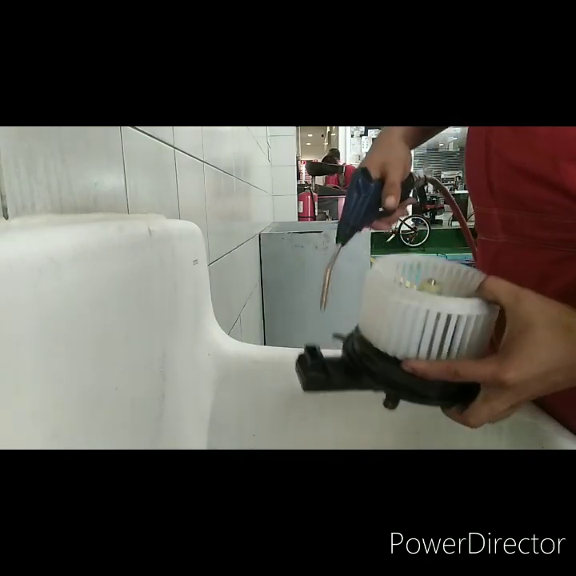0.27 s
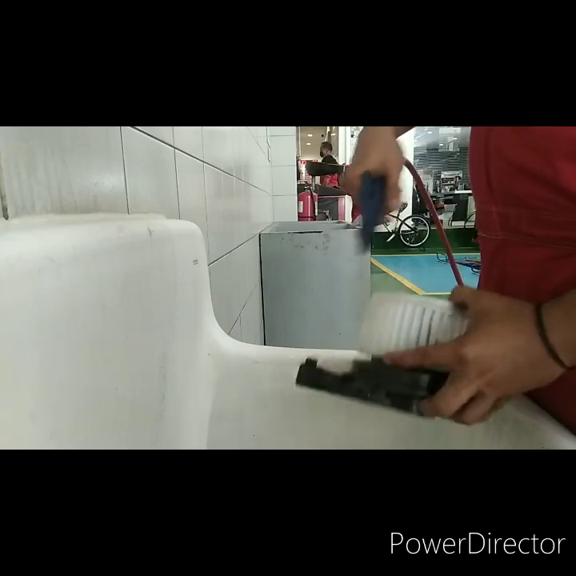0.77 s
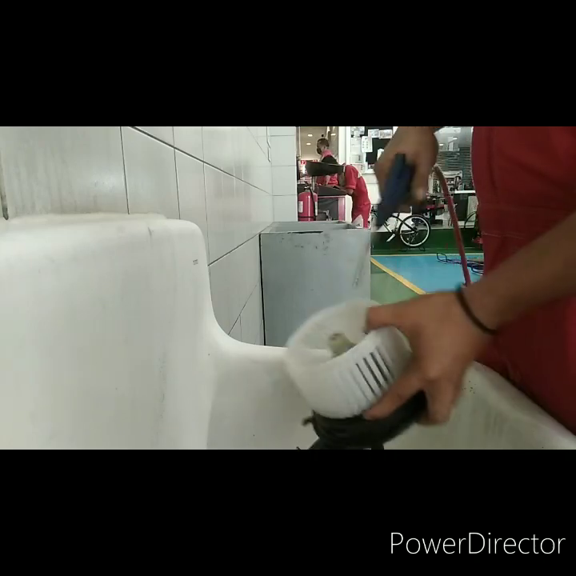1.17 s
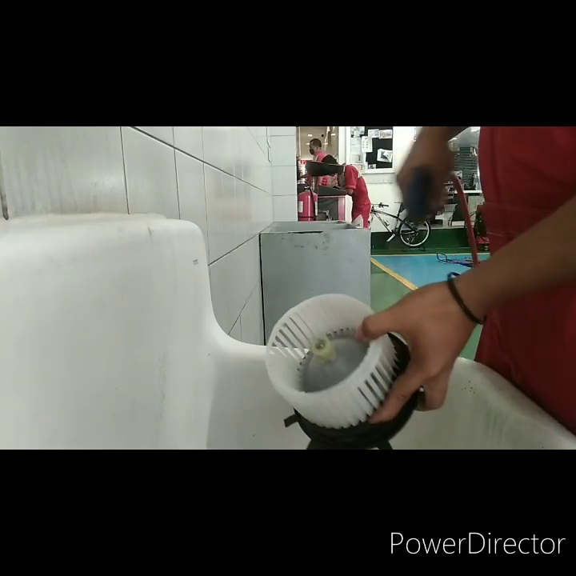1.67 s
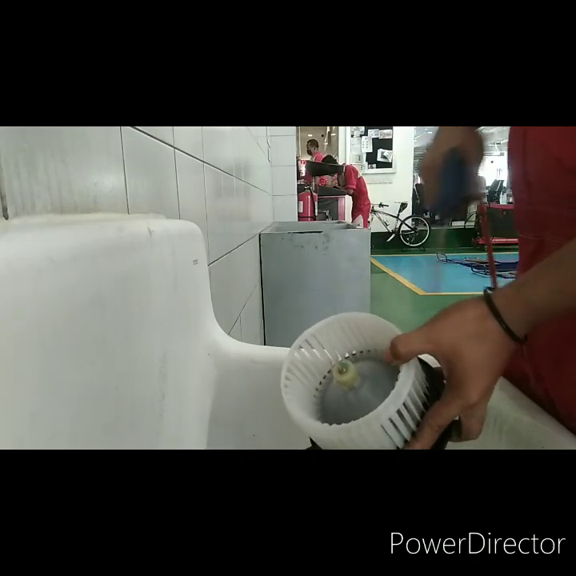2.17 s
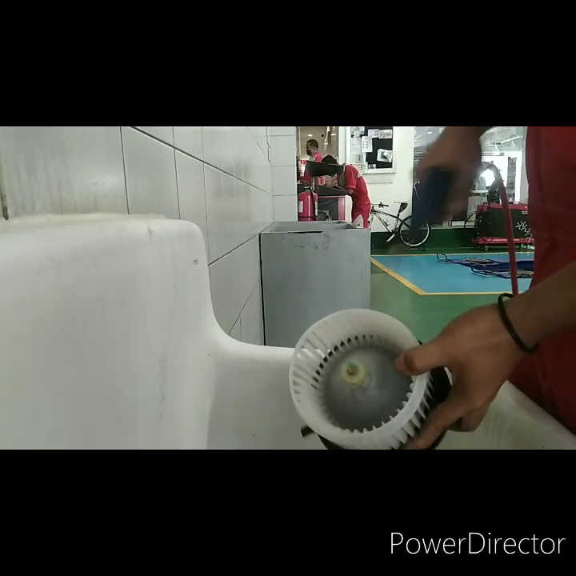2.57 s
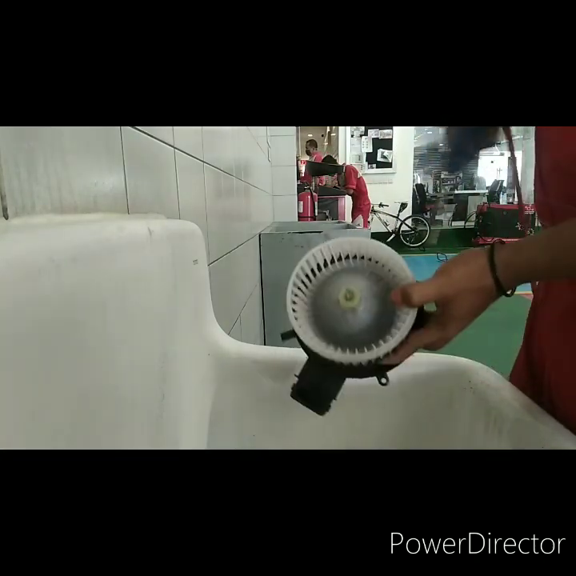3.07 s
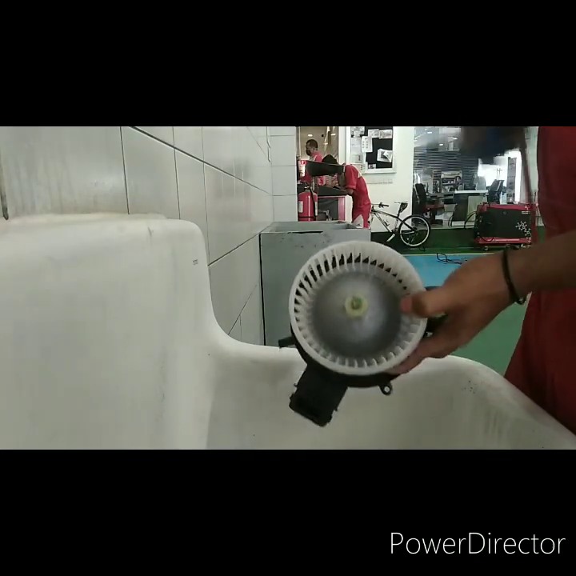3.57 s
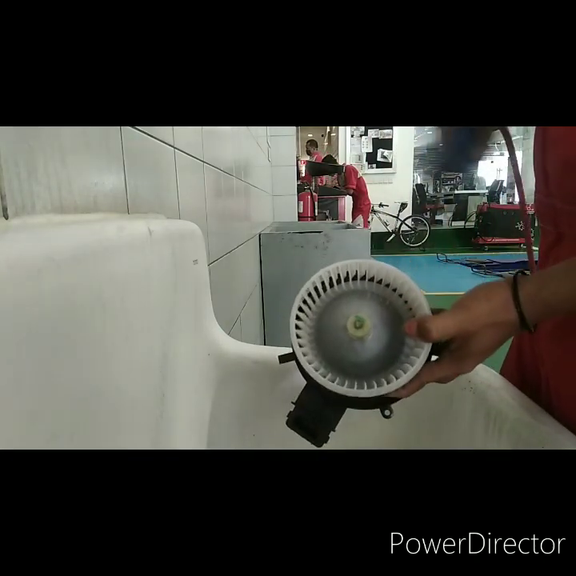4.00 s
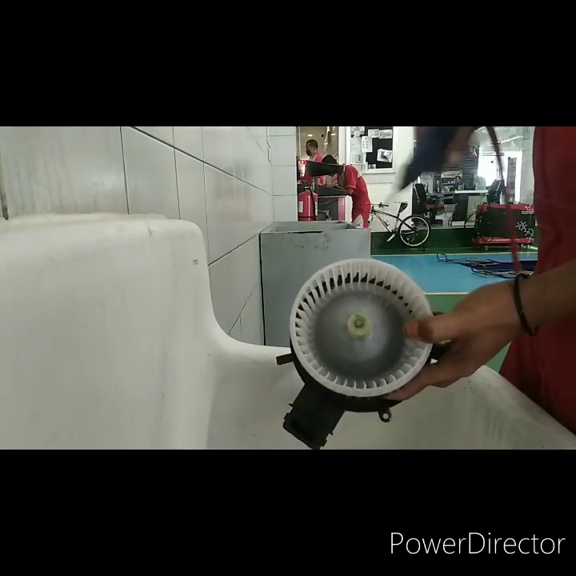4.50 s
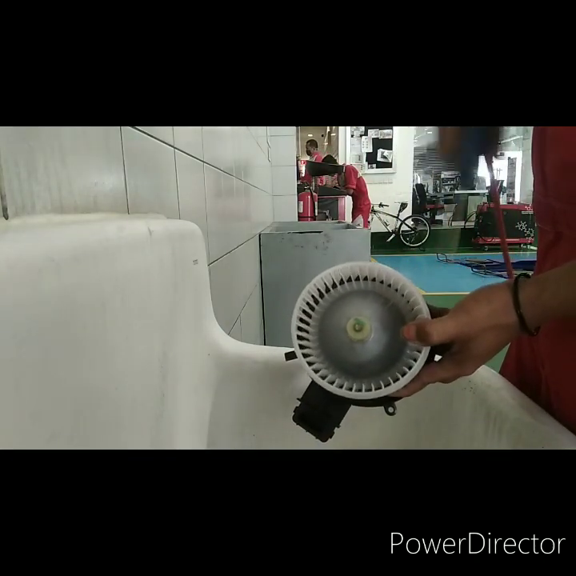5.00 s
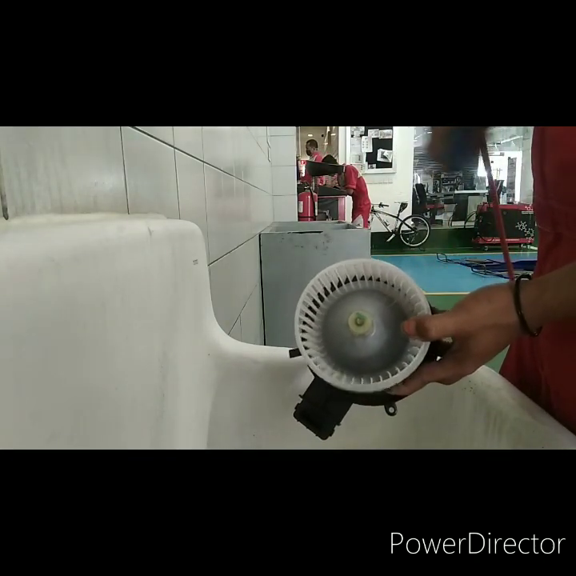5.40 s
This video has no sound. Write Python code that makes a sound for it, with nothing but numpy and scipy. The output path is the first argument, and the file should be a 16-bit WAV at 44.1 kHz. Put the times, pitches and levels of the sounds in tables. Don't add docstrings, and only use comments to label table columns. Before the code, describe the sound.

A compressed-air gun hisses and roars in a big workshop, its jet fluttering and flaring as it sweeps across a plastic fan wheel.

```python
import sys
import numpy as np
from scipy import signal
from scipy.fft import rfft, irfft, next_fast_len
from scipy.io import wavfile
from scipy.ndimage import uniform_filter1d

SR = 44100
rng = np.random.default_rng(int(sys.argv[2]) if len(sys.argv) > 2 else 0)


def convert_level_to_amplitude(level_db):
    exponent = np.asarray(level_db, float) / 20
    return 10 ** exponent


def store_wav(level_fs):
    pcm = np.round(np.clip(np.atleast_2d(level_fs), -1, 1) * 32767)
    wavfile.write(sys.argv[1], SR, pcm.T.astype(np.int16))


N = 249165
N_FFT = next_fast_len(N)
TIME = np.arange(N) / SR

# (frequency [Hz], level [dB per Hz])
TAIL_COLOUR = [(500, -11), (1200, -9), (2400, 0), (4400, 1), (10800, -10), (13600, -23), (17000, -40)]
HALL_COLOUR = [(20, -30), (60, -24), (150, -4), (300, -6), (550, -8.5), (1200, -12), (4000, -24),
               (16000, -37)]
# (frequency [Hz], level [dB per Hz])
ROAR_COLOUR = [(1200, -12), (2200, -6.5), (3000, -2), (5000, -1), (6500, -3), (8000, 0), (12000, -41)]
TEARING_COLOUR = [(5000, -11), (7000, -11), (8500, -5), (9800, -1), (11500, -1.5), (12800, -10),
                  (14000, -19), (16000, -30)]
NOZZLE_COLOUR = [(9000, -24), (12000, -13.5), (13500, -9.5), (17000, -12)]
# (frequency [Hz], level [dB per Hz])
BUFFET_COLOUR = [(25, -40), (75, -30), (110, -10), (170, -1), (300, -1.5), (480, -2.5), (800, -8.5),
                 (1600, -37)]
RUSH_COLOUR = [(250, -5.5), (500, -4.5), (800, 0.5), (1300, -1), (2000, -2), (2800, -5), (5000, -10)]
# (time [s], level [dB])
AIM = [(.3, -1.5), (.43, 4), (.59, 4), (.8, 1.5), (1.2, -2), (1.45, 1.5), (1.65, 1.5), (2.0, 1), (2.3, 0.5),
       (2.7, 0.5), (3.1, -1), (3.4, -1.5), (3.67, -2.5), (3.85, 0), (4.1, .5), (4.7, -0.5), (5.1, -1),
       (5.65, -1)]
# (middle [s], length [s], boost [dB])
CROSSINGS = [(0.791, 0.054, 0.5), (0.948, 0.089, 2.5), (1.133, 0.039, 3), (1.261, 0.088, 2.5),
             (1.544, 0.16, 1.5), (1.732, 0.044, 2.4), (1.901, 0.052, 1.8), (1.988, 0.057, 2.8),
             (2.197, 0.093, 1.8), (2.442, 0.063, 2.2), (2.677, 0.052, 3.2), (2.885, 0.12, 1),
             (3.128, 0.059, 3.5), (3.207, 0.021, 2), (3.339, 0.034, 0.5), (3.448, 0.047, 2),
             (3.523, 0.025, -2), (3.628, 0.023, 1), (3.794, 0.046, 3.5), (4.001, 0.043, 3.5),
             (4.193, 0.055, 4), (4.409, 0.061, 5), (4.621, 0.059, 4), (4.829, 0.098, 4.0),
             (5.048, 0.074, 3.5), (5.185, 0.034, 1), (5.265, 0.057, 3.5), (5.477, 0.051, 2.5)]
# (middle [s], length [s], loss [dB])
MISSES = [(0.723, 0.094, 3), (1.112, 0.072, 2.3), (1.374, 0.045, 2.5), (1.449, 0.084, 4),
          (1.66, 0.098, 1.4), (1.765, 0.049, 3.5), (2.104, 0.075, 2.5), (2.313, 0.054, 2.6),
          (2.548, 0.072, 2), (2.789, 0.054, 3), (3.018, 0.056, 3.5), (3.15, 0.019, 3), (3.231, 0.09, 1.9),
          (3.41, 0.057, 2), (3.495, 0.044, 2.5), (3.595, 0.034, 3), (3.662, 0.033, 4.5),
          (3.895, 0.066, 1.5), (4.075, 0.052, 3), (4.3, 0.043, 1.5), (4.406, 0.034, 4.5),
          (4.515, 0.08, 1.7), (4.836, 0.043, 1), (4.949, 0.053, 2), (5.061, 0.045, 2), (5.166, 0.037, 2.3),
          (5.376, 0.061, 1), (5.573, 0.077, 1)]
# (middle [s], loss [dB])
TIPS = [(0.544, 3), (0.617, 2), (0.909, 1), (1.088, 1), (1.297, 1.3), (1.381, 1), (1.531, 0.8), (1.651, 1),
        (2.02, 1), (2.324, 1), (2.531, 1.4), (2.707, 1.0), (2.782, 1), (3.163, 3), (3.304, 3), (3.385, 1.6),
        (3.499, 1), (3.583, 3), (3.655, 1.4), (3.884, 1), (3.961, 1.2), (4.048, 1.4), (4.168, 1.9),
        (4.458, 0), (4.68, 1), (4.893, 1), (5.102, 2), (5.313, 1.0), (5.442, 2.1), (5.517, 2.3)]
# (start [s], end [s], level [dB])
GUSTS = [(0.39, 0.626, -26.5), (0.65, 0.67, -26), (0.776, 0.897, -27), (0.92, 1.04, -31),
         (1.14, 1.153, -24), (1.216, 1.227, -28), (1.27, 1.288, -23), (1.504, 1.623, -27.5),
         (1.725, 1.735, -25.5), (1.82, 1.837, -33), (1.933, 2.067, -28.5), (2.154, 2.294, -28),
         (2.393, 2.43, -31), (2.458, 2.52, -28.5), (2.617, 2.67, -28.5), (2.707, 2.75, -27.5),
         (2.846, 2.982, -27.5), (3.055, 3.19, -29), (3.26, 3.413, -29.5), (3.467, 3.635, -29),
         (3.685, 3.872, -29.5), (3.931, 4.077, -28), (4.122, 4.282, -29), (4.333, 4.5, -27),
         (4.538, 4.935, -28), (4.979, 5.14, -28), (5.19, 5.355, -29.5), (5.4, 5.474, -29.5),
         (5.502, 5.563, -28), (5.618, 5.654, -28.5)]


def rms_one(x):
    return x / np.sqrt(np.mean(x ** 2, axis=-1, keepdims=True) + 1e-20)


def ramp(start_s, rise_s):
    return np.clip((TIME - start_s) / rise_s, 0, 1)


def drift(rate_hz):
    hop = 64
    pole = np.exp(-2 * np.pi * rate_hz * hop / SR)
    noise = rng.standard_normal((2, N // hop + 1002))
    slow = signal.lfilter([1], [1, -2 * pole, pole * pole], noise)[:, 1000:]
    return np.repeat(rms_one(slow), hop, axis=1)[:, :N]


def turbulence(colour, patchy_db, rate_hz, alike_hz=1.0):
    hz = np.maximum(np.fft.rfftfreq(N_FFT, 1 / SR), 1)
    colour_hz, colour_db = np.transpose(colour)
    left, other = rfft(rng.standard_normal((2, N_FFT)))
    alike = 1 / (1 + (hz / alike_hz) ** 2)
    right = alike * left + np.sqrt(1 - alike ** 2) * other
    level_db = np.interp(np.log(hz), np.log(colour_hz), colour_db, left=-90, right=-90)
    pair = np.array([left, right]) * convert_level_to_amplitude(level_db)
    centres_hz = np.geomspace(colour_hz[0], colour_hz[-1], num=4)
    total = 0
    for share in np.eye(len(centres_hz)):
        band = np.sqrt(np.interp(np.log(hz), np.log(centres_hz), share))
        flicker = convert_level_to_amplitude(patchy_db * drift(rate_hz))
        total = total + irfft(pair * band, N_FFT)[:, :N] * flicker
    return rms_one(total)


def burst(start_s, end_s, centre_hz, width_hz, level_db):
    edges_hz = [centre_hz - width_hz / 2, centre_hz + width_hz / 2]
    band = signal.butter(2, edges_hz, "band", fs=SR, output="sos")
    swell = np.sqrt(np.sin(np.pi * ramp(start_s, end_s - start_s)).clip(0))
    return convert_level_to_amplitude(level_db) * swell * rms_one(signal.sosfilt(band, rng.standard_normal(N)))


def workshop():
    tail_db = -37.5 - 60 * TIME / 2.4
    tail = convert_level_to_amplitude(tail_db) * turbulence(TAIL_COLOUR, patchy_db=0.5, rate_hz=7.9)
    hall = convert_level_to_amplitude(-55) * turbulence(HALL_COLOUR, patchy_db=1.5, rate_hz=6, alike_hz=550)
    return tail + hall


def distant_machine():
    return burst(start_s=0.005, end_s=0.13, centre_hz=168, width_hz=30, level_db=-55)


def aim_db():
    time_s, level_db = np.transpose(AIM)
    return np.interp(TIME, time_s, level_db)


def sweeps_db(sweeps):
    coarse = TIME[::32]
    bumps = 0
    for middle_s, length_s, height_db in sweeps:
        offset = np.abs(2 * (coarse - middle_s) / length_s)
        bumps = bumps + height_db * 2 ** -offset ** 6.3
    return np.interp(TIME, coarse, bumps)


def ports(level_db, pan_db):
    left_share = 1 / (1 + convert_level_to_amplitude(-2 * pan_db) * np.ones(N))
    return 2 * convert_level_to_amplitude(level_db) * np.sqrt([left_share, 1 - left_share])


def jet(opened):
    aim, flare, miss = aim_db(), sweeps_db(CROSSINGS), sweeps_db(MISSES)
    tip = sweeps_db([(middle_s, 0.035, loss_db) for middle_s, loss_db in TIPS])
    first = 4.8 * np.clip(np.minimum((TIME - 0.33) / 0.03 + 1, (0.53 - TIME) / 0.015), 0, 1)
    trigger_db = -25 * (1 - ramp(0.26, 0.044)) ** 1.5

    roar_db = -23.5 + aim - 0.95 * miss
    tearing_db = -20.5 + 0.42 * aim + first + 1.43 * flare - 0.14 * miss
    nozzle_db = -20 + 0.15 * aim - 0.3 * first + 0.48 * flare - 1.7 * tip

    roar = ports(roar_db, 0.11) * turbulence(ROAR_COLOUR, patchy_db=-0.4, rate_hz=22)
    tearing = ports(tearing_db, -2.5) * turbulence(TEARING_COLOUR, patchy_db=1.0, rate_hz=19)
    nozzle = ports(nozzle_db, 0.25) * turbulence(NOZZLE_COLOUR, patchy_db=0.6, rate_hz=14)
    return opened * convert_level_to_amplitude(trigger_db) * (roar + tearing + nozzle)


def basin(x):
    scatter = 2.1
    shared = 0.94
    _, _, lines = signal.stft(x, SR, nperseg=1024, noverlap=768)
    real, imag = rng.standard_normal((2, 3) + lines.shape[1:])
    for axis, size in ((1, 3), (1, 2), (2, 12), (2, 8)):
        real = uniform_filter1d(real, size=size, axis=axis)
        imag = uniform_filter1d(imag, size=size, axis=axis)
    paths = real + 1j * imag
    paths = np.sqrt(shared) * paths[2] + np.sqrt(1 - shared) * paths[:2]
    paths = paths / np.sqrt(np.mean(np.abs(paths) ** 2))
    response = np.abs(1 + scatter * paths) / np.hypot(1, scatter)
    return signal.istft(lines * response, SR, nperseg=1024, noverlap=768)[1][:, :N]


def draught(opened):
    left_buffet, left_rush = gusty_port()
    right_buffet, right_rush = steady_port()
    eddies = convert_level_to_amplitude(1.3 * drift(72))
    buffet_gain = convert_level_to_amplitude(1.46) * np.array([left_buffet, right_buffet])
    buffet = buffet_gain * turbulence(BUFFET_COLOUR, patchy_db=0.8, rate_hz=42)
    forerunner = convert_level_to_amplitude(-43) * ramp(0.27, 0.025)
    rush_gain = convert_level_to_amplitude(2.5) * np.maximum([left_rush, right_rush], forerunner)
    rush = rush_gain * turbulence(RUSH_COLOUR, patchy_db=2.5, rate_hz=12.6)
    return opened * eddies * (buffet + rush)


def valve():
    filling = burst(start_s=0.274, end_s=0.33, centre_hz=620, width_hz=90, level_db=-43)
    return filling * convert_level_to_amplitude(np.array([[1.5], [-1.5]]))


def steady_port():
    miss = sweeps_db(MISSES)
    buffet_db = -27.5 - 0.14 * miss
    rush_db = -25 - 1.64 * miss + 0.26 * aim_db()
    return convert_level_to_amplitude(np.array([buffet_db, rush_db])) * [ramp(0.338, 0.03), ramp(0.317, 0.094)]


def gusty_port():
    lull_db = np.array([[-44], [-36]])
    power = convert_level_to_amplitude(2 * lull_db) * ramp(0.345, 0.015)
    for start_s, end_s, buffet_db in GUSTS:
        rush_db = buffet_db - 0.5 + 1.15 * (start_s - TIME.mean())
        gust = slice(round(start_s * SR), round(end_s * SR))
        power[:, gust] = convert_level_to_amplitude(2 * np.array([[buffet_db], [rush_db]]))
    edge = round(0.015 * SR / 2)
    for _ in range(2):
        power = uniform_filter1d(power, size=edge)
    return np.sqrt(np.abs(power))


def scene():
    opened = ramp(0.26, 0.015)
    return workshop() + distant_machine() + basin(jet(opened)) + draught(opened) + valve()


def top_cut(x):
    return signal.sosfilt(signal.butter(12, 16760, fs=SR, output="sos"), x)


def record(dry):
    soft = 0.72 * np.tanh(dry / 0.72)
    low_pass = signal.ellip(12, 0.5, 80, 15480, fs=SR, output="sos")
    mix = signal.sosfilt(low_pass, soft)
    return top_cut(mix)


dry = scene()
out = record(dry)
store_wav(out)
```